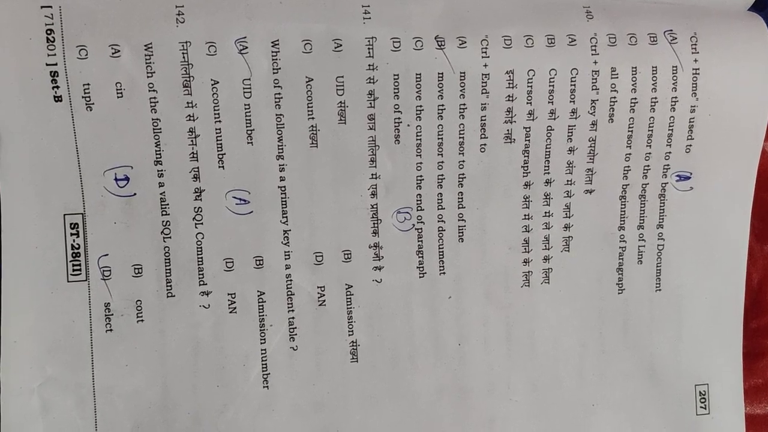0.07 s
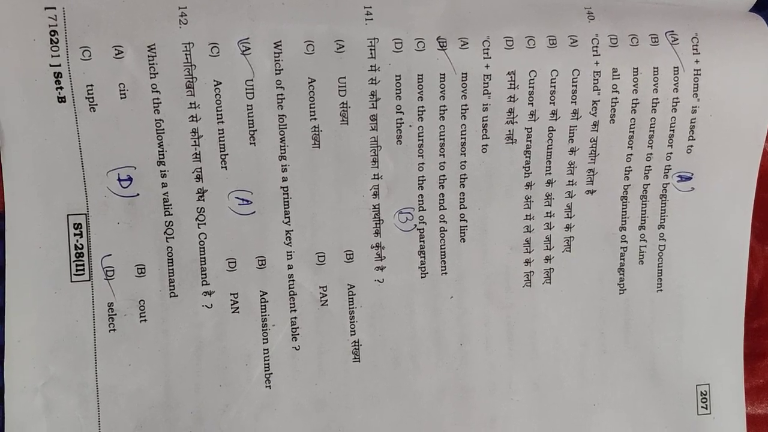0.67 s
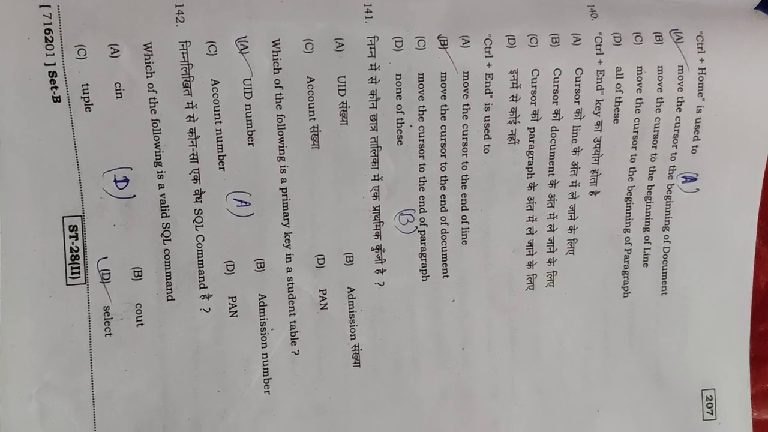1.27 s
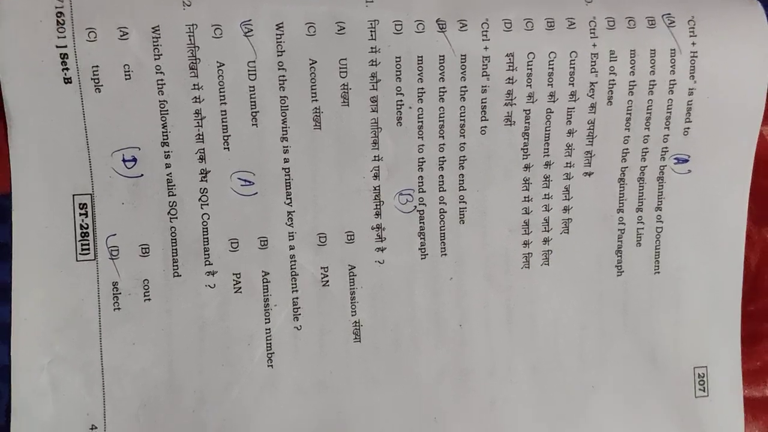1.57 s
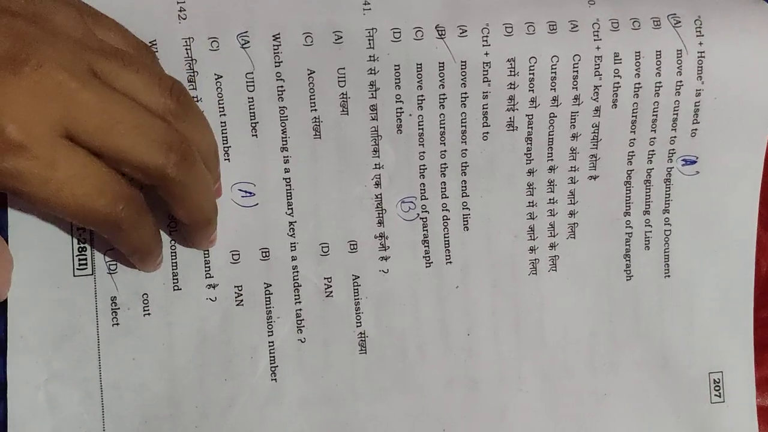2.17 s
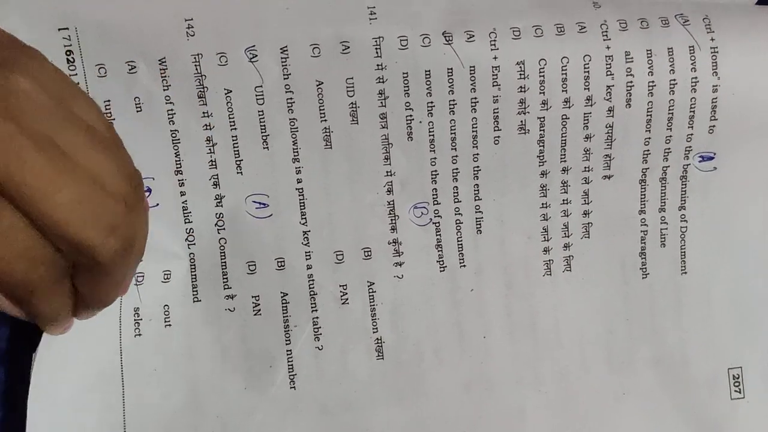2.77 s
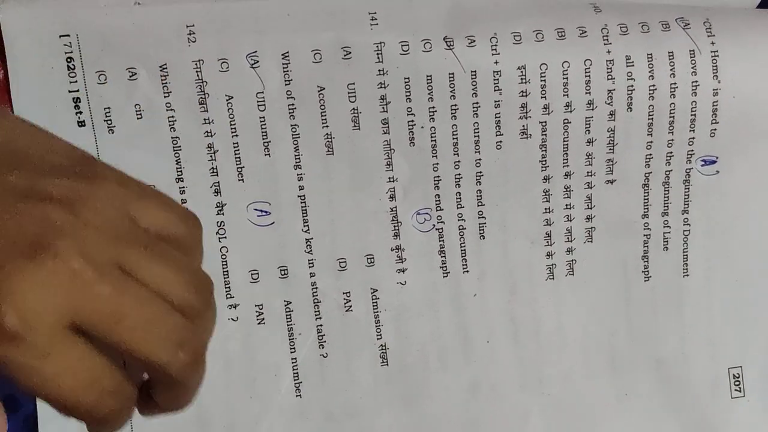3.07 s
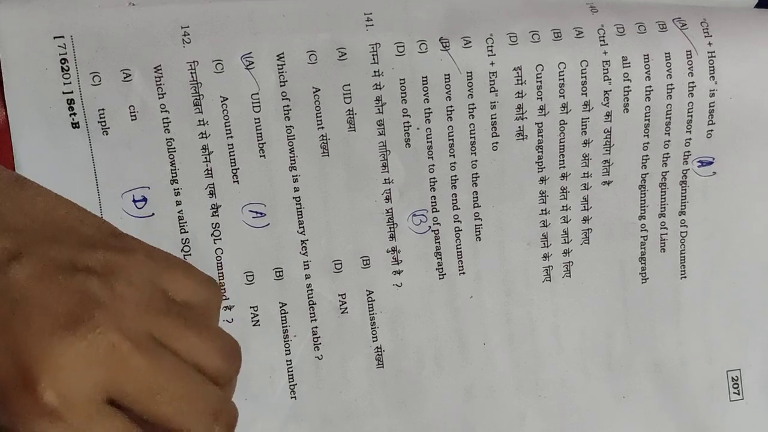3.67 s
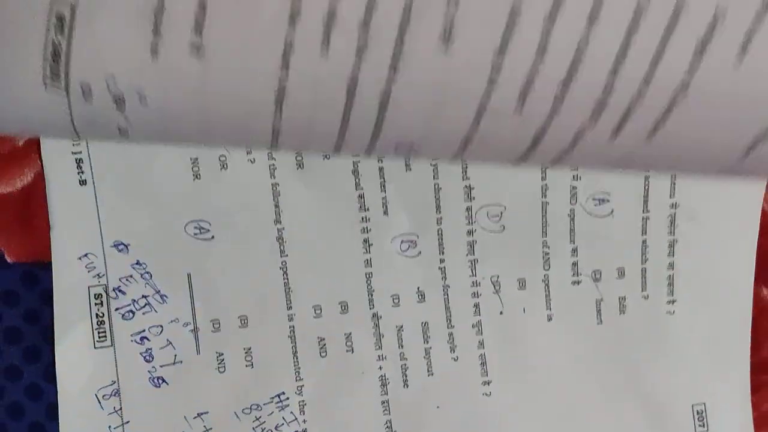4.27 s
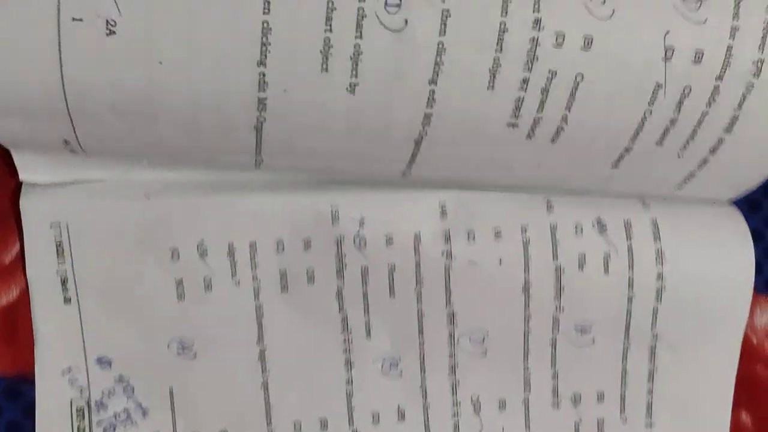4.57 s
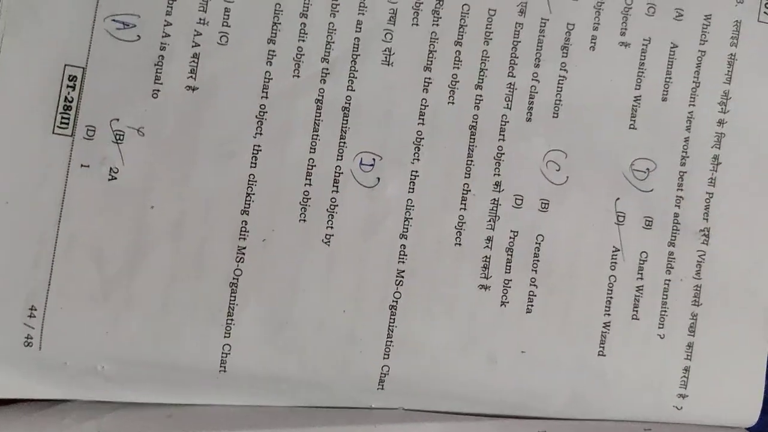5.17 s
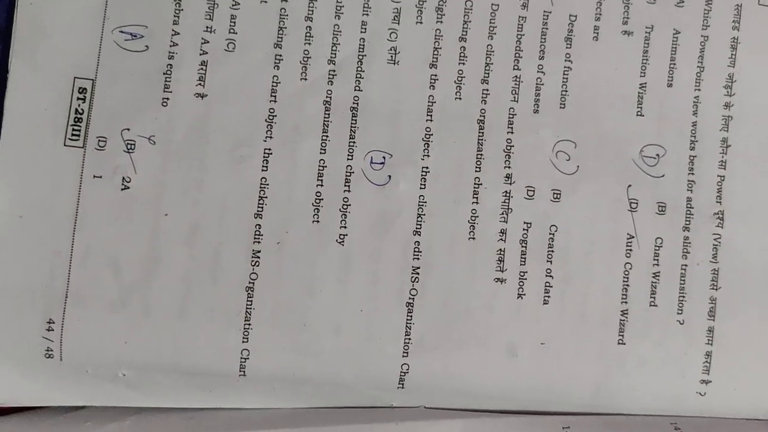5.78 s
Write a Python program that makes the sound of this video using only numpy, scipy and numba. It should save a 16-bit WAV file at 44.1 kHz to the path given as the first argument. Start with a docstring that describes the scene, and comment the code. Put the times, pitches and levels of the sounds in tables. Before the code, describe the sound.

Close to the microphone, a booklet is handled in a quiet room with a low hum. First a finger scrapes the microphone on the left, ending in a sharp click, the loudest sound. Soft swishes of a hand on paper follow, with small ticks and dull bumps. Then a page lifts, flicks and rustles as it turns over, and a few more strokes smooth it down.

```python
"""A quiet room, with a booklet handled right under a phone. Over a low hum and a faint whine, a finger
brushes the left microphone port (its small opening): skin sticks, slips and peels off with a sharp click.
A hand slides over the paper, and catching fibres hiss and rustle. It lifts a page, which buckles in a
few soft flicks as it turns, squeaks as it settles and is smoothed flat."""
import sys
import numpy as np
from scipy import signal
from scipy.fft import rfft, irfft
from scipy.io import wavfile
from scipy.ndimage import uniform_filter1d, map_coordinates
from numba import njit

SR = 44100
rng = np.random.default_rng(int(sys.argv[2]) if len(sys.argv) > 2 else 0)


def generate_wav(sig):
    """Save sig (samples, or channels by samples) to the path in sys.argv[1] as 16-bit PCM at SR."""
    pcm = np.round(np.clip(np.atleast_2d(sig).T, -1, 1) * 32767).astype(np.int16)
    wavfile.write(sys.argv[1], SR, pcm)


N = 265482
TIME = np.arange(N) / SR
FREQS = np.maximum(np.fft.rfftfreq(N, 1 / SR), 1)

# How much louder the left port is than the right: frequency_hz, left_lead_db
PORT_BALANCE = [(60, 3.5), (200, 2), (400, 6), (700, 1.5), (1300, 2.5), (2400, 0.5), (4400, -0.5),
                (8100, 2), (15000, 10)]
# How alike the two ports sound: frequency_hz, likeness (0 to 1)
PORT_LIKENESS = [(130, 0.98), (290, 0.85), (640, 0.13), (1400, 0.022), (15000, 0.01006)]
# Tone colour of the room's rumble and hiss: frequency_hz, gain_db
ROOM_COLOUR = [(15, -11.5), (25, 5), (43, -19.5), (119, -22.5), (297, -28), (410, -33.5), (1800, -46),
               (2420, -45), (3930, -47.5), (10000, -48), (15500, -56)]
# Blurred tones of a distant appliance: pitch_hz, width_hz, level_db
HUM_TONES = [(70, 17, -65), (176.2, 22, -69.5), (295.6, 40, -78), (562, 35.5, -86)]
# Tone colour of the thin buzz: frequency_hz, gain_db
BUZZ_OVERTONES = [(4200, -11), (6000, -5), (7300, -7), (10200, -8), (11500, 1), (12900, -5), (14000, -1),
                  (15200, -2)]
# The moving hand pushes air at the left port: start_s, hold_s, level_db
HAND_GUSTS = [(0, 1, -44.5), (1.065, 0.13, -33), (2.693, 0.66, -51.5), (3.177, 0.23, -41.5)]
# The sheet buckles or taps: start_s, snap_db, pitch_hz, rustle_db, fade_s (time to fall by 60 dB)
PAGE_FLICKS = [(0.916, -56, 2000, -58, 0.21), (2.604, -49, 500, -55, .077),
               (2.6596, -44.5, 1040, -47, 0.045), (2.917, -57, 5500, -53, .08),
               (3.495, -55, 2200, -62, .06), (3.622, -57, 2200, -66, .06), (3.734, -57, 1500, -63.5, 0.079),
               (3.841, -48, 1780, -59.5, .083), (4.113, -39, 1900, -50, .04), (4.1302, -37, 1400, -47, .04),
               (4.1328, -27.5, 1500, -43, .07), (4.138, -39, 1900, -48, .04), (4.1435, -39, 2200, -47, .04),
               (4.149, -40, 1400, -51, .05), (4.5002, -46, 450, -58, .05), (4.5022, -39, 520, -55, .07),
               (4.5036, -39, 520, -60, .04), (4.5052, -39.5, 480, -56, .05), (4.5069, -44, 450, -59, .06),
               (4.6248, -31.5, 3400, -37, .033), (4.6316, -38, 3000, -47, .045),
               (4.735, -47, 1100, -52, 0.053), (4.7458, -46, 700, -51, 0.17), (4.757, -46, 596, -51, 0.16),
               (4.775, -46, 900, -53, .06)]
# Where the stiff sheet rings: pitch_hz, width_hz, gain_db
SHEET_RINGS = [(377, 120, 3.5), (720, 110, 2), (1190, 550, 0), (1750, 630, 1.5), (2700, 710, -5.5),
               (5660, 1200, 2.5), (9800, 4900, 5)]
# The hand bumps the phone: time_s, level_db, pitch_hz
HAND_BUMPS = [(1.0, -46, 50), (1.086, -36.5, 310), (1.0945, -44, 400), (1.115, -35, 55.4),
              (1.1745, -23.5, 399), (1.1905, -23, 280), (1.1935, -24, 270), (2.97, -45.5, 44.8),
              (3.165, -44, 36.4), (3.25, -44, 56.6), (3.388, -36.5, 49.7), (3.54, -44.5, 39.6)]
# Skin sticks and slips on the left port: time_s, level_db, pitch_hz
SKIN_SLIPS = [(1.0312, -37.5, 3300), (1.0672, -37, 2600), (1.093, -28, 1100), (1.1008, -28, 2000),
              (1.1026, -24, 2300), (1.1058, -26, 4000), (1.1086, -30, 4000), (1.1265, -25, 4000),
              (1.1453, -20, 3500), (1.1551, -25, 2200), (1.166, -24, 1500), (1.167, -22, 2500),
              (1.1716, -24, 4500), (1.17418, 0.5, 2400), (1.177, -20, 4500), (1.1846, -19, 4000),
              (1.1878, -10, 1800), (1.1894, -7, 2600), (1.1904, -14, 1500), (1.1913, -8.5, 1400),
              (1.19205, -2.5, 3300), (1.19215, -5.5, 1250)]
# Where the air pocket under the fingertip rings: pitch_hz, width_hz, gain_db
POCKET_RINGS = [(1130, 180, -9), (2290, 300, -13.5), (4200, 248, -13)]
# The finger drags over the port: start_s, hold_s, level_db, pitch_hz
SKIN_SCRAPES = [(1.098, 0.016, -50, 650), (1.112, 0.054, -53, 1500), (1.173, 0.0047, -34.5, 1304),
                (1.19, .005, -28.5, 1296), (1.1944, .005, -36, 1900)]
# Skin peels off the port: start_s, hold_s, level_db, release_s
SKIN_PEELS = [(1.189, 0.0031, -22.5, 0.0022), (1.2015, 0.011, -30, 0.0075)]
# Strokes of hand and page over paper:
# start_s, hold_s, hiss_db, rustle_db, change_db (over the hold), left_lead_db, brightness_db
PAPER_STROKES = [(1.258, 0.5, -68.5, -70.5, 8.5, 3.5, -1), (1.744, 0.12, -49, -56.5, 0.5, 7, 2.5),
                 (1.933, 0.12, -48.5, -53.5, -5.5, 7, -2), (2.141, 0.076, -66, -68.5, 4, -1, -1),
                 (2.292, 0.022, -71, -76, 4.5, 0, -3), (2.407, 0.015, -66.5, -72.5, 2, 0, -2),
                 (2.523, 0.13, -65, -67, 6.5, 0.5, -5), (2.602, 0.0084, -53.5, -66, -1, -1.5, 3),
                 (2.78, 0.15, -56, -61, 2, -3, -7), (3.03, 0.29, -51.5, -58.5, 0, 10.5, 3),
                 (3.417, 0.4, -70.5, -81.5, -3, -2, -1), (3.813, 0.016, -58.5, -64.5, 4.5, -3, -2),
                 (3.959, 0.041, -53.5, -60, 3.5, -0.5, -7), (4.035, 0.14, -50, -62, -2, 17, 9),
                 (4.14, 0.25, -45, -50, -5, 4.5, 2), (4.496, 0.0042, -53.5, -52.5, -5.5, 2.5, -6),
                 (4.567, 0.079, -55, -58.5, 7, 6, -2), (4.743, 0.2, -48.5, -53.5, 1, 4.5, -0.5),
                 (5.048, 0.11, -50.5, -54.5, 3.5, 11.5, 0.5), (5.298, 0.033, -60.5, -64.5, 7, 0, -2),
                 (5.419, 0.27, -63, -66, -8.5, 10, 2), (5.728, 0.023, -54.5, -62, -5.5, 1, 0),
                 (5.898, 0.093, -43, -50, -1, 10, 4.5)]
# Tone colour of the fibres' fine hiss: frequency_hz, gain_db
FIBRE_COLOUR = [(2500, -14), (4500, -11), (6500, -3), (8500, -1.5), (10300, -0.5), (12500, -4.5),
                (15800, -10)]
# Tone colour of the whole sheet's rustle: frequency_hz, gain_db
SHEET_COLOUR = [(150, 2.5), (350, -3), (700, -2.5), (1200, -3.5), (2100, -1.5), (3300, -2), (5000, -3.5),
                (9000, -39.5)]
# Air pockets under the hand: start_s, hold_s, level_db, top_pitch_hz, width (share of pitch), opening_s
HAND_POCKETS = [(1.803, 0.03, -57.5, 1680, 0.05, .067), (2.75, 0.085, -62, 1750, .8, .012),
                (3.028, .005, -63, 400, 0.57, .067), (3.134, .2, -71.5, 440, 0.67, .067)]
# The path of the settling page's squeak: time_s, pitch_hz, level_db
SQUEAK_PATH = [(4.8, 556, -77), (4.89, 586, -53), (4.95, 612, -59), (5.01, 602, -53), (5.07, 600, -65),
               (5.17, 600, -73.5)]


def undb(db):
    """Turn decibels into a number to multiply by."""
    return 10 ** (np.asarray(db) / 20)


def unit(x):
    """Scale a signal to an average power of 1."""
    return x / np.sqrt(np.mean(x ** 2))


def across(points):
    """Join (frequency_hz, value) points into a curve, giving each octave equal room."""
    hz, value = np.transpose(points)
    return np.interp(np.log(FREQS), np.log(hz), value)


def shape(x, gain):
    """Filter a sound with one gain for each frequency."""
    return irfft(rfft(x) * gain, N)


def resonance(hz, width_hz):
    """Gain at each frequency for something that rings at hz."""
    return 1 / (1 + 1j * (FREQS ** 2 - hz ** 2) / (FREQS * width_hz))


def wander(per_s):
    """A smooth random wobble that picks a new value per_s times a second."""
    step = max(int(SR / per_s), 1)
    stairs = np.repeat(rng.standard_normal(N // step + 1), step)
    return unit(uniform_filter1d(uniform_filter1d(stairs, step), step)[:N])


def swell(start_s, hold_s, attack_s, release_s):
    """A loudness curve that rises smoothly to reach 1 at start_s, holds and dies away."""
    away = np.maximum(start_s - TIME, 0) / attack_s + np.maximum(TIME - start_s - hold_s, 0) / release_s
    return np.exp(-away ** 1.42) * (away < 10)


def ports(left_lead_db):
    """Left and right gains that keep the total power the same."""
    gain = undb(np.outer([1, -1], left_lead_db) / 2)
    return gain / np.sqrt(np.mean(gain ** 2, axis=0))


def noise(gain, grain_db=0):
    """Filtered noise at both ports, alike in the bass; grain_db roughens it into tiny uneven clicks."""
    shared, opposite = rng.standard_normal((2, N)) * undb(grain_db * wander(3000))
    alike = np.clip(across(PORT_LIKENESS), 0, 1)
    shared = shape(shared, gain * np.sqrt(1 + alike))
    opposite = shape(opposite, gain * np.sqrt(1 - alike))
    return np.array([shared + opposite, shared - opposite]) / np.std(shared)


@njit
def sweep(x, hz, width_hz):
    """A filter that lets through one band, whose centre and width can move."""
    out, band_state, low_state = np.empty(len(x)), 0., 0.
    for i in range(len(x)):
        tuning, damping = np.tan(np.pi * hz[i] / SR), width_hz[i] / hz[i]
        band = (band_state + tuning * (x[i] - low_state)) / (1 + tuning * (tuning + damping))
        band_state = 2 * band - band_state
        low_state += 2 * tuning * band
        out[i] = damping * band
    return out


def moving_band(hz, share):
    """Steady noise in a band that follows hz; its width is that share of the pitch."""
    width_hz = hz * share
    return unit(sweep(rng.standard_normal(N), hz, width_hz) / np.sqrt(width_hz))


def snap(t, hz):
    """One push and pull of air pressure around t = 0, with peak 1, strongest at hz."""
    angle = 2 * np.pi * hz * t
    return -16 / np.sqrt(27) * angle / (1 + angle ** 2) ** 2


def snaps(rows):
    """One snap for each row of time_s, level_db, pitch_hz."""
    return sum(undb(db) * snap(TIME - time_s, hz) for time_s, db, hz in rows)


def room():
    """Low rumble and faint hiss, the hum of a distant appliance, and a drone that swells at the end."""
    hum = sum(undb(db) * noise(resonance(hz, width_hz) ** 2) for hz, width_hz, db in HUM_TONES)
    drone = noise(resonance(hz=63, width_hz=17) ** 2) * undb(-53)
    drone *= swell(start_s=5.93, hold_s=.2, attack_s=.35, release_s=.5)
    rumble = noise(undb(across(ROOM_COLOUR)) * (FREQS > 20)) * undb(-53 + .21 * wander(5.1))
    return rumble + hum + drone


def whine():
    """A faint, high, flickering whine fades just before the finger touches."""
    tone = unit(shape(rng.standard_normal(N), resonance(hz=2452, width_hz=115) ** 2))
    return tone * undb(-80.5) * swell(start_s=0, hold_s=.79, attack_s=.1, release_s=.15)


def buzz(pitch_hz=606):
    """A thin buzz of high overtones, mostly on the left, fades as the finger touches."""
    overtones = sum(np.sin(2 * np.pi * (k * pitch_hz * TIME + rng.random())) for k in range(7, 26))
    tone = unit(shape(overtones, undb(across(BUZZ_OVERTONES))))
    loudness = undb(-72.5) * swell(start_s=0, hold_s=1.05, attack_s=.1, release_s=.1)
    return np.outer([1, .4], tone * loudness)


def draught(edge_s=.037, still_air_db=-55.5):
    """The moving hand makes slow swings of air pressure at the port, mostly too low to hear."""
    gusts = sum(undb(db) * swell(start_s, hold_s, edge_s, edge_s) for start_s, hold_s, db in HAND_GUSTS)
    swings = unit(shape(rng.standard_normal(N), resonance(hz=12, width_hz=12.3) ** 2))
    return swings * (undb(still_air_db) + gusts)


def flicks(grain_db=4, lead_s=.005):
    """Each buckle snaps once and leaves a short, grainy rustle running through the sheet."""
    out = np.zeros((2, N))
    t = np.arange(SR // 5) / SR - lead_s  # begins early to fit the first half of the snap
    for start_s, snap_db, hz, rustle_db, fade_s in PAGE_FLICKS:
        band = signal.butter(2, [hz * .21, min(hz * 2, SR / 3)], "bandpass", fs=SR, output="sos")
        grains = rng.standard_normal((2, len(t))) * undb(grain_db * rng.standard_normal(len(t)))
        rustle = unit(signal.sosfilt(band, grains))
        fade = (t > 0) * undb(-60 * np.abs(t) / fade_s)
        first = int((start_s - lead_s) * SR)
        out[:, first:first + len(t)] += undb(snap_db) * snap(t, hz) + undb(rustle_db) * rustle * fade
    return out


def stiff_paper(buckles):
    """Buckles make the stiff sheet ring in a few broad bands."""
    power = sum(np.abs(undb(db) * resonance(hz, width_hz)) ** 2 for hz, width_hz, db in SHEET_RINGS)
    return shape(buckles, np.sqrt(power))


def bumps():
    """The hand knocks the phone with soft, low thuds."""
    return snaps(HAND_BUMPS)


def finger():
    """Skin snaps, scrapes and peels over the port, ringing the pocket of air under the fingertip."""
    rubbing = shape(skin_scrape() + skin_peel(), 1 / (1 + (FREQS / 14000) ** 4))  # soften the treble
    pocket = sum(undb(db) * resonance(hz, width_hz) for hz, width_hz, db in POCKET_RINGS)
    return shape(snaps(SKIN_SLIPS) + rubbing, undb(-2) + pocket)


def skin_scrape(grain_db=3.5):
    """Skin drags over the port in short, gritty bursts."""
    out = 0
    for start_s, hold_s, db, hz in SKIN_SCRAPES:
        drag = swell(start_s, hold_s, attack_s=.0084, release_s=.011)
        out += moving_band(np.full(N, float(hz)), share=1.2) * undb(db) * drag
    return out * unit(undb(grain_db * wander(1500)))


def skin_peel(start_hz=6600, rise_hz_per_s=73000):
    """Air hisses through the gap as skin peels away; the pitch rises as the gap opens."""
    since_s = TIME - SKIN_PEELS[0][0]
    hz = np.clip(start_hz + rise_hz_per_s * since_s, start_hz, SR / 4)
    opening = sum(undb(db) * swell(start_s, hold_s, attack_s=.003, release_s=release_s)
                  for start_s, hold_s, db, release_s in SKIN_PEELS)
    return moving_band(hz, share=.71) * opening


def strokes():
    """Each stroke speeds up, presses or eases, and stops. Gives hiss and rustle strength, and brightness."""
    hiss_power, rustle_power, brightness = np.zeros((3, 2, N))
    for start_s, hold_s, hiss_db, rustle_db, change_db, left_lead_db, bright_db in PAPER_STROKES:
        edge = hold_s ** .23  # shorter strokes start and stop more quickly
        speed = swell(start_s, hold_s, attack_s=.12 * edge, release_s=.11 * edge)
        progress = np.clip((TIME - start_s) / hold_s, 0, 1)
        effort = speed * undb(change_db * progress)
        power = (effort * undb(hiss_db) * ports(left_lead_db)) ** 2
        hiss_power += power
        brightness += power * bright_db  # louder strokes count for more
        rustle_power += (effort * undb(rustle_db) * ports(.085 * left_lead_db)) ** 2
    return np.sqrt(hiss_power), np.sqrt(rustle_power), brightness / (hiss_power + 1e-18)


def flicker(hiss, depth_db=1.6, per_s=45, band_hz=300):
    """Neighbouring bands of a hiss flicker separately at random, so it sounds a little patchy."""
    hz, time_s, bands = signal.stft(hiss, SR, nperseg=512)
    grid = np.array(np.meshgrid(hz / band_hz, time_s * per_s, indexing="ij"))
    chance = rng.standard_normal((int(grid[0].max()) + 2, int(grid[1].max()) + 2))
    gain = unit(undb(depth_db * map_coordinates(chance, grid, mode="nearest")))
    return signal.istft(bands * gain, SR, nperseg=512)[1][..., :N]


def crinkle(per_s, spread_db):
    """Single fibres let go in scattered, uneven ticks."""
    ticks = (rng.random(N) < per_s / SR) * undb(spread_db * rng.random(N))
    return unit(shape(ticks * rng.standard_normal((2, N)), resonance(hz=3100, width_hz=2700)))


def fibre_hiss(strength, bright_db, treble_hz=11300):
    """Fibres catch in a fine, scratchy hiss that wavers with the uneven stroke."""
    hiss = flicker(noise(undb(across(FIBRE_COLOUR)), grain_db=.5))
    hiss += undb(-17.5) * crinkle(per_s=93, spread_db=16)
    treble = shape(hiss, 1 / (1 + (treble_hz / FREQS) ** 10))
    treble_gain = undb(bright_db + .6 * wander(5))  # drifts as the contact shifts
    return (hiss - treble + treble * treble_gain) * strength * undb(-3.5 + .37 * wander(60))


def sheet_rustle(strength):
    """The whole rubbed sheet rustles lower down, in coarser grains."""
    rustle = flicker(noise(undb(across(SHEET_COLOUR)), grain_db=1))
    return rustle * strength * undb(-4.5 + 1.16 * wander(60))


def air_pockets(sag_s=.094):
    """Rubbing rings thin pockets of air under the hand; the pitch of each rises and falls."""
    out = 0
    for start_s, hold_s, db, top_hz, share, opening_s in HAND_POCKETS:
        from_middle_s = TIME - start_s - hold_s / 2
        arch = (1 + 2 / (1 + (from_middle_s / sag_s) ** 2)) / 3  # a third lower sag_s from the middle
        loudness = undb(db) * swell(start_s, hold_s, opening_s, release_s=.058)
        out += moving_band(top_hz * arch, share) * loudness
    return out


def flutter():
    """The bending page gives a low, soft murmur that fades as it settles."""
    settling = swell(start_s=4.47, hold_s=.2, attack_s=.15, release_s=.97)
    return noise(resonance(hz=256.5, width_hz=116) ** 2) * undb(-61) * settling


def squeak():
    """The settling page judders in a short, rough tone."""
    time_s, pitch_hz, level_db = np.transpose(SQUEAK_PATH)
    hz = np.interp(TIME, time_s, pitch_hz) * (1 + .014 * wander(150))
    loudness = undb(np.interp(TIME, time_s, level_db) + 2 * wander(110) - 1)
    sounding = (TIME >= time_s[0]) & (TIME <= time_s[-1])
    return loudness * sounding * np.sin(2 * np.pi * np.cumsum(hz) / SR)


def scene():
    """Paper and room reach both ports, mostly the left more strongly; the touch reaches only the left."""
    hiss_strength, rustle_strength, bright_db = strokes()
    rubbing = sheet_rustle(rustle_strength) + air_pockets()
    turning = flutter() + stiff_paper(flicks()) + squeak()
    both_ports = shape(rubbing + turning + room(), ports(across(PORT_BALANCE)))
    both_ports += fibre_hiss(hiss_strength, bright_db) + whine() + buzz()
    touch = finger() + bumps() + draught()
    return both_ports + np.outer([1, 0], touch)


def record(dry):
    """The phone flattens peaks beyond full scale and cuts the highest treble."""
    top_hz = 15750
    treble_cut = signal.ellip(10, .1, 70, top_hz, fs=SR, output="sos")
    return signal.sosfilt(treble_cut, np.clip(dry, -1, 1))


dry = scene()
out = record(dry)
generate_wav(out)
```